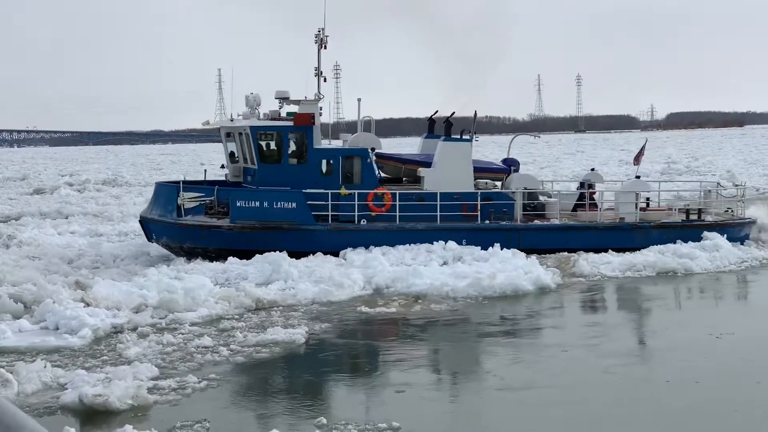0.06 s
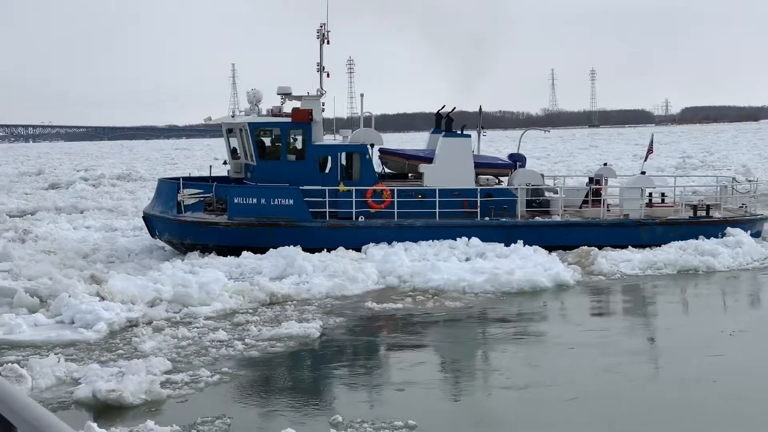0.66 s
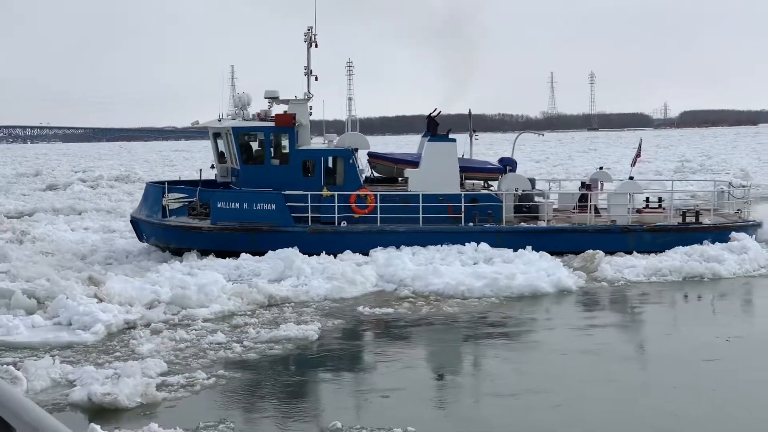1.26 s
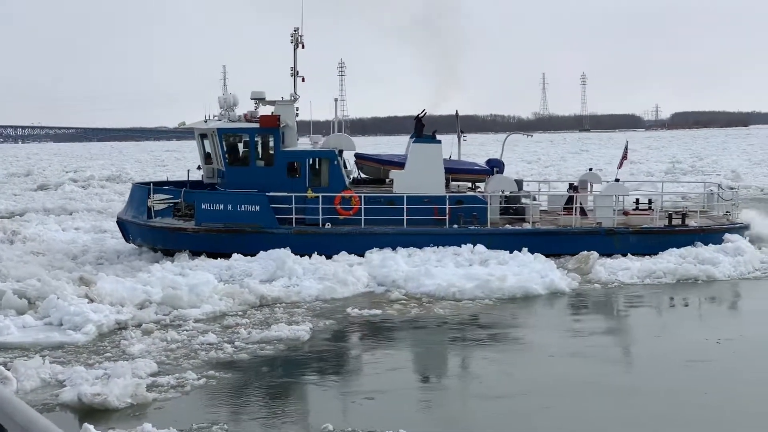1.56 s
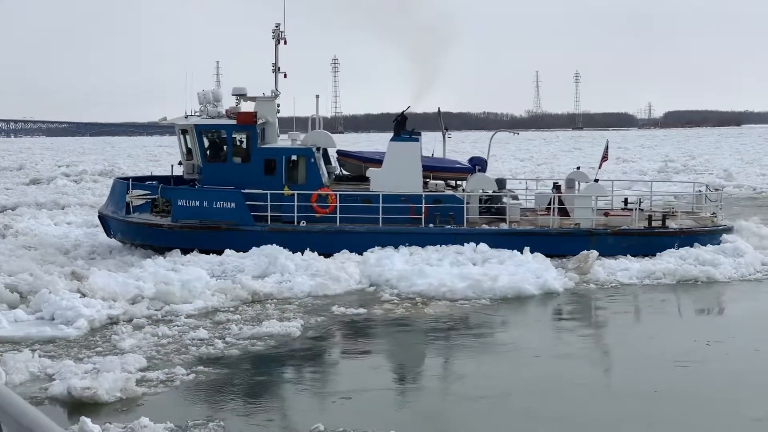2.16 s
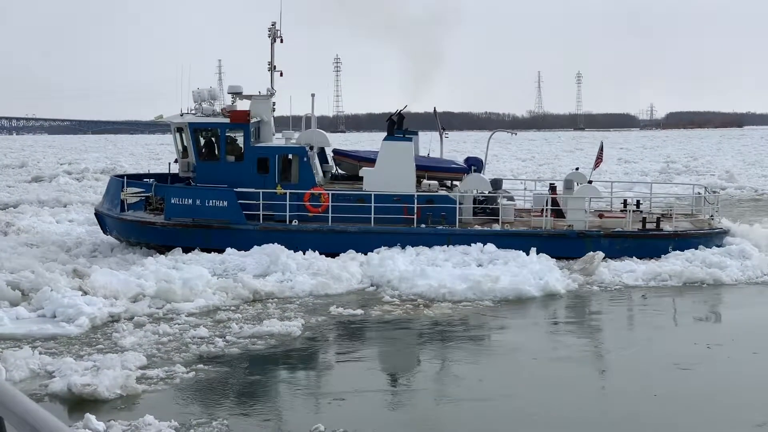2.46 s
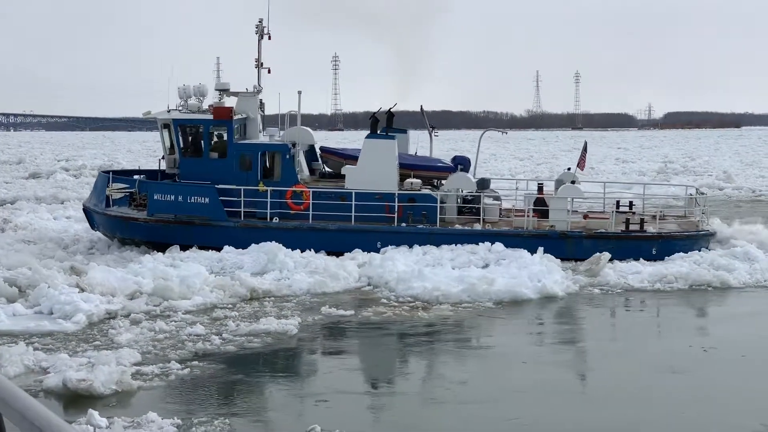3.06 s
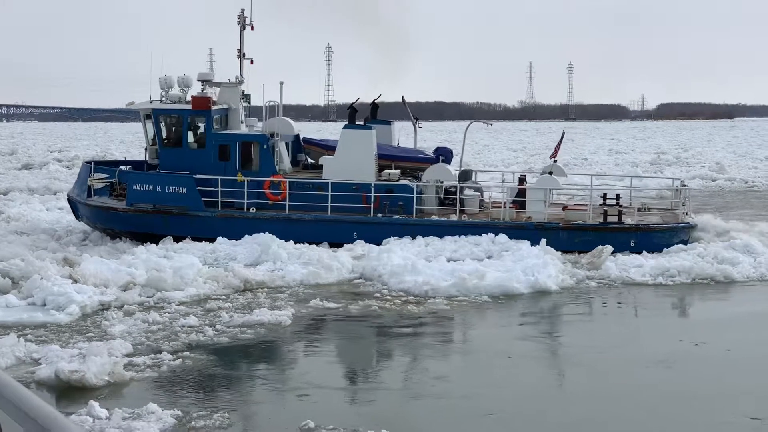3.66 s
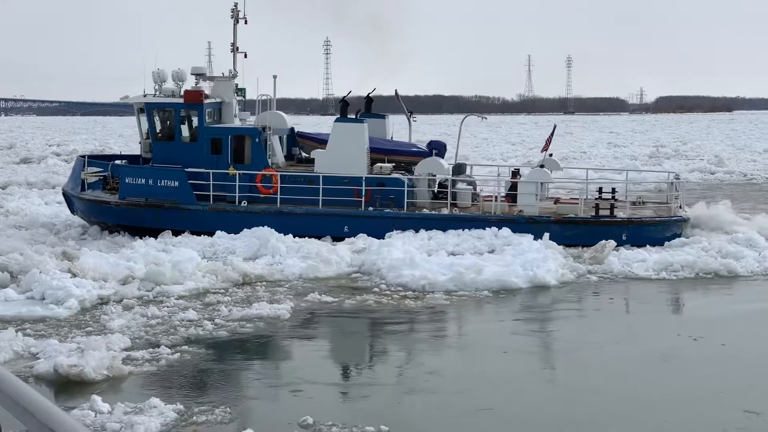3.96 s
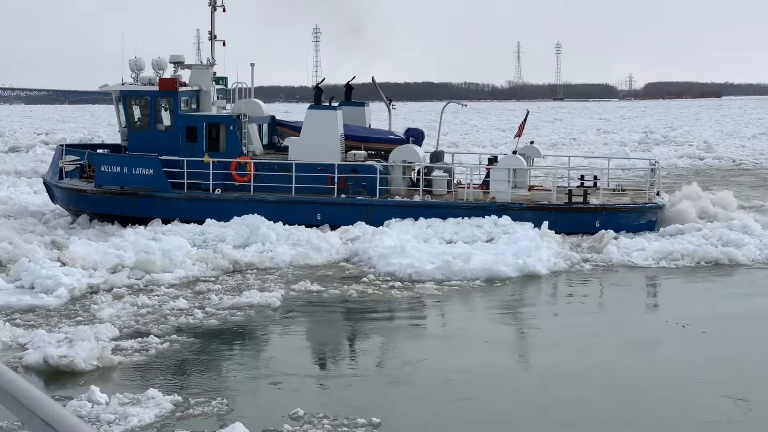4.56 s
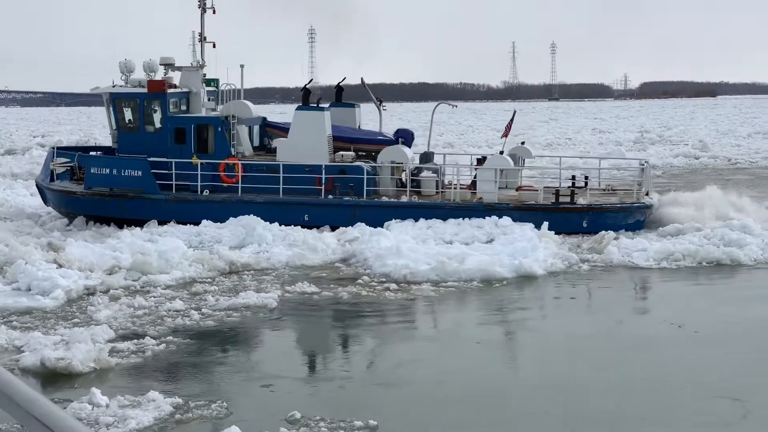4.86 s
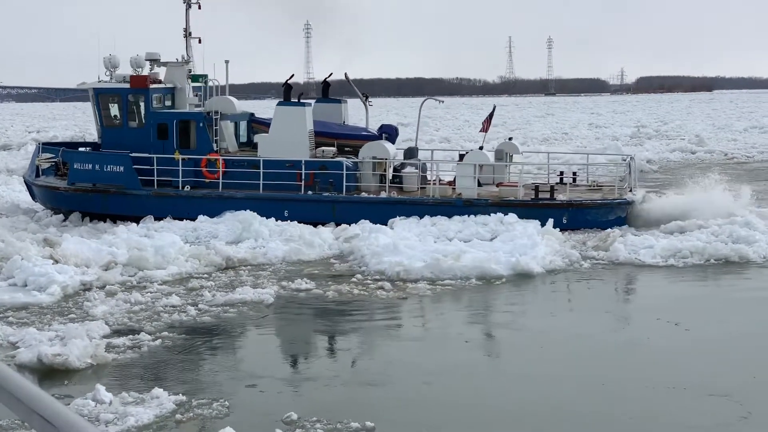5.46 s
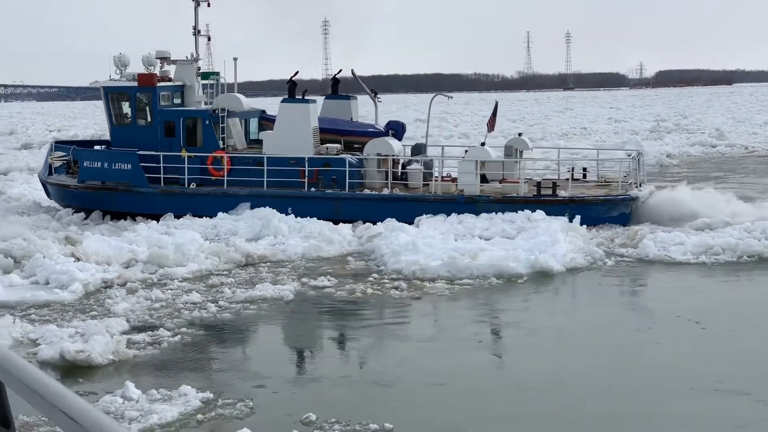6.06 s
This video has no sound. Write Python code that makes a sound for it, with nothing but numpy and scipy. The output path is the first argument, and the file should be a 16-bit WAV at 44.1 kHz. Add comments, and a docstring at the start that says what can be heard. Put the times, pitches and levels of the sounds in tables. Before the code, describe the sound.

A tug pushes through broken river ice, heard from a nearby deck for about six seconds. A deep, throbbing engine and propeller rumble with puffing exhaust runs throughout. Above it a high squeal holds nearly one pitch while fluttering in strength, with machinery clatter, gear whine and a faint thin whistle. Slush churns and fizzes softly. Floes thump the hull at about 0.6 and 0.8 seconds, and more lightly at 1.7. From around 2.5 seconds ice rasps more clearly along the hull. It cracks and crumbles near 2.9, knocks and snaps between 3.8 and 4.1, and again at 4.4 and 4.8. The engine drone builds from 4.6 to 5.6 seconds. The propeller wash boils up from about 4.9, throwing gritty spatters of slush from 5.4 to the end. Close by, a loose metal part faintly squeaks and jingles on and off.

```python
"""A tug's engines and propeller rumble through broken river ice, heard from a deck nearby.
The exhaust puffs, turbulence flutters a squeal from the drive, clatter rings the machinery casing,
gears whine and turbochargers whistle. The wash churns, fizzes and finally gushes up astern.
Ice rasps, knocks and cracks along the hull. Close by, a loose metal part squeaks and jingles."""
import sys
import numpy as np
from scipy import signal
from scipy.fft import rfft, irfft
from scipy.io import wavfile
from scipy.ndimage import uniform_filter1d

SR = 44100
rng = np.random.default_rng(int(sys.argv[2]) if len(sys.argv) > 2 else 0)


def wrap_up_sound(samples):
    """Save the sound to the file named by the first command line argument, as 16-bit audio."""
    columns = np.atleast_2d(samples).T
    # keep every value between -1 and 1, then stretch to whole-number steps
    tamed = np.clip(columns, -1, 1)
    steps = np.round(tamed * 32767).astype(np.int16)
    wavfile.write(sys.argv[1], SR, steps)


N = 277830
TIME = np.arange(N) / SR
HZ = np.fft.rfftfreq(N, 1 / SR)

# Working levels. Each row: time in seconds, then machinery, churn and fizz in relative dB.
WORK_LEVELS = [(0, -34.5, -49.5, -55.5), (.75, -35.5, -50, -55.5), (1.5, -33.5, -47.5, -55),
               (2.6, -34.5, -51, -57), (3.85, -33.5, -49, -54.5), (4.45, -34, -50, -55.5),
               (5.5, -32.5, -50.5, -54), (6, -33, -47, -50), (6.3, -30.5, -51, -53)]
# Spectrum of machinery din and ice crunch. Each row: frequency in Hz, relative density in dB.
DIN_SPECTRUM = [(300, -12.5), (460, -2.5), (570, 2.5), (720, 0.5), (950, 3.5), (1100, -1.5), (1400, 0.5),
                (1700, -4), (2200, -5.5), (2450, -11.5), (2750, -28.5), (4000, -17.5)]
# Stereo balance. Each row: frequency in Hz, left minus right in dB.
BALANCE_DB = [(60, 0.6), (400, -0.5), (700, 0.5), (1290, 4), (2380, 3.5), (2650, 4), (3300, -4),
              (4000, -.7), (6000, -4), (6900, -.7), (8100, 0), (15000, -0.5)]
# Stereo phase. Each row: frequency in Hz, lead of the left channel in radians.
LEAD_RAD = [(500, 0), (900, 0.2), (1300, -0.36), (1750, -0.3), (2300, 1.4), (2650, -0.1), (3200, 2),
            (3700, 0.9), (4100, 0.54), (4750, 1.3), (5400, -5.5), (6100, -3.5), (6500, -3.5), (6900, -7),
            (7500, -4)]


def gain_of(db):
    """Decibels to amplitude."""
    return 10 ** (np.asarray(db) / 20)


def pan(side_db):
    """Stereo gains: left up and right down by side_db."""
    return gain_of([[side_db], [-side_db]])


def unit_rms(x):
    """Scales to rms 1."""
    return x / np.sqrt(np.mean(abs(x) ** 2) + 1e-20)


def steadied(x, window_s):
    """Holds the running rms of the channel mean at 1."""
    power = uniform_filter1d(x.mean(0) ** 2, max(int(window_s * SR), 2))
    return x / np.sqrt(abs(power) + 1e-20)


def over_hz(rows):
    """Interpolates a table on a log frequency axis."""
    hz, value = np.transpose(rows)
    return np.interp(np.log(HZ + 1), np.log(hz + 1), value)


def colour(rows):
    """Gain per frequency bin, rolled off beyond the table's ends."""
    rolloff = np.minimum(HZ / rows[0][0], 1) ** 2 / np.maximum(HZ / rows[-1][0], 1) ** 4
    return gain_of(over_hz(rows)) * rolloff


def curves(rows):
    """Interpolates each column of a time table per sample."""
    times_s, *columns = np.transpose(rows)
    return [np.interp(TIME, times_s, column) for column in columns]


def swell(centre_s, length_s):
    """Cosine arch from 0 to 1 and back."""
    return np.cos(np.pi * np.clip((TIME - centre_s) / length_s, -.5, .5))


def add(mix, start_s, sound):
    """Mixes a sound in, in place."""
    part = mix[max(round(start_s * SR), 0):][:len(sound)]
    part += sound[:len(part)]


def phase_of(hz):
    """Running phase of a pitch curve."""
    return 2 * np.pi * np.cumsum(hz) / SR


def drift(rate_hz):
    """Slow random curve of rms 1."""
    return unit_rms(irfft(rfft(rng.standard_normal(N)) / (1 + (HZ / rate_hz) ** 4), N))


def noise(shape, lead_rad=0, grains_per_s=0, share=0, size_db=3.0):
    """Coloured stereo noise; grains carry the given share of its power."""
    # Each row: frequency in Hz, left-right coherence.
    coherence = [(25, 0.96), (70, 0.77), (150, 0.83), (350, 0.98), (750, 0.9), (1100, 0.92), (1400, 0.61),
                 (1900, 0.86), (2350, 0.35), (2700, 0.86), (3700, 0.52), (4400, 0.6), (4950, .2), (5700, 1),
                 (6400, 0.45), (7000, 0.65), (8200, 0.83), (9400, 0.84), (9900, 1), (11000, 1), (12000, .9),
                 (13300, .97), (15200, 1)]
    source = rng.standard_normal((2, N))
    if grains_per_s:
        signs = rng.choice([-1, 1], (2, N))
        sizes = gain_of(size_db * np.minimum(rng.exponential(1, (2, N)), 3))
        grains = signs * sizes * (rng.random((2, N)) < grains_per_s / SR)
        source = np.sqrt(1 - share) * source + np.sqrt(share) * unit_rms(grains)
    left, independent = rfft(source)
    common = np.clip(over_hz(coherence), 0, .999)
    right = (common * left + np.sqrt(1 - common ** 2) * independent) * np.exp(-1j * lead_rad)
    tilt = gain_of(over_hz(BALANCE_DB) / 2)
    return irfft(np.array([left * tilt, right / tilt]) * shape, N)


def skirt(width_hz):
    """Complex noise of rms 1 that smears a tone over nearby pitches."""
    lowpass = 1 / (1 + (HZ / width_hz) ** 2)
    return unit_rms(noise(lowpass) + 1j * noise(lowpass))


def partial(hz, waver_hz, flutter_hz=8, flutter_db=3.0):
    """Panned tone wavering in pitch and level."""
    tone = np.sin(phase_of(hz + waver_hz * drift(flutter_hz))) * gain_of(flutter_db * drift(flutter_hz))
    return unit_rms(tone) * pan(np.interp(hz, HZ, over_hz(BALANCE_DB)) / 2)


def tone_swells(rows):
    """Sines that swell briefly and fade."""
    phases = rng.uniform(0, 2 * np.pi, len(rows))
    return sum(gain_of(db) * swell(s, length_s) * np.sin(2 * np.pi * hz * TIME + phase)
               for (s, length_s, hz, db), phase in zip(rows, phases))


def engines(labour_start_s=4.6, labour_end_s=5.58, ramp_s=0.09, labour_db=13.5, build_db_per_s=6):
    """Propeller rumble and puffing exhaust; under load the firing tone builds out of them."""
    # Each row: pitch in Hz, level in dB. The firing tone is first.
    low_tones = [(69.6, -33.5), (105.8, -39), (153.5, -40)]
    # Each row: centre and length in seconds, rumble and roar change in dB.
    heaves = [(.09, 0.17, 5.5, 0.5), (0.237, 0.099, -1, 2), (.55, .2, 5, -2), (.7, 0.083, -2, -2),
              (1.043, 0.52, 3, -1.5), (1.565, 0.13, 1, -1), (1.774, 0.14, -3, 2.5), (1.889, .14, 0, -2),
              (2.332, 0.11, 5, 2), (2.796, 0.4, 2, 1.5), (3.313, 0.19, -8, 1), (3.424, 0.07, 1, 5.5),
              (3.662, 0.23, 0, -2), (3.83, 0.044, 3, 3.5), (3.94, 0.16, 4, 2), (4.187, 0.15, 6, -1),
              (4.605, 0.14, 5.5, -4), (5.607, 0.21, -5, 3), (5.93, 0.063, 6, 2), (6.249, 0.31, 1, 2.5)]
    # Each row: frequency in Hz, relative density in dB.
    propeller_spectrum = [(15, -10), (25, -21), (33, 4), (45, 3.5), (65, 4.5), (80, -3), (100, -12),
                          (125, -42)]
    exhaust_spectrum = [(60, -44), (85, -3), (105, 0), (140, -4), (200, -6), (240, -10.5), (290, -17),
                        (400, -49)]
    # Two engines fall into step. Each row: centre and length in seconds, pitch in Hz, peak in dB.
    throbs = [(.04, 0.11, 88.4, -17.5), (.872, 0.15, 77, -17), (1.279, 0.17, 99.6, -19.5),
              (1.39, 0.07, 71.1, -22.5), (1.51, 0.095, 76.5, -18), (1.567, 0.079, 38, -19.5),
              (1.667, 0.1, 70, -18), (1.79, 0.19, 43, -19.5), (2.05, 0.088, 89, -16),
              (2.24, 0.089, 69.7, -15.5), (2.33, 0.079, 61, -17), (2.38, 0.11, 84, -20),
              (2.76, 0.098, 82.2, -19.5), (2.9, 0.1, 84, -19.5), (3.3, 0.24, 100, -19.5),
              (3.431, 0.095, 71.5, -16), (3.744, 0.065, 72.9, -17.5), (3.833, 0.05, 87.5, -19),
              (6.216, 0.14, 75.8, -23)]
    load = np.clip(np.minimum(TIME - labour_start_s, labour_end_s - TIME) / ramp_s, 0, 1)
    firing_db = load * (labour_db - build_db_per_s * (labour_end_s - TIME))
    drone = 0
    for (hz, db), lift_db in zip(low_tones, [firing_db, 0, 0]):
        wander_db = 0.5 * (1 - load) * drift(1.4) + 3.5 * drift(6.2)
        tone = np.sqrt(2) * np.sin(phase_of(hz + 1.14 * drift(3.46)))
        drone += gain_of(db + lift_db + wander_db) * tone
    rumble_db, roar_db = sum(np.outer(dbs, swell(s, length_s)) for s, length_s, *dbs in heaves)
    rumble = steadied(noise(colour(propeller_spectrum)), 0.2)
    rumble *= gain_of(-26.5 + rumble_db + load + 0.3 * drift(15))  # 1 dB up under load
    roar = steadied(noise(colour(exhaust_spectrum), grains_per_s=250, share=0.24), 0.24)
    roar *= gain_of(-26.5 + roar_db + 1.33 * drift(6.6))  # puffs
    return rumble + roar + drone + tone_swells(throbs)


def drive_squeal(skirt_hz=24, sag_hz=6.0, waver_hz=1.71, purity=0.78):
    """Turbulence shakes a drive tone into a fluttering skirt; it rings purer as it flares."""
    # Each row: time in seconds, pitch in Hz.
    pitch = [(0, 858), (1.2, 860), (1.7, 864), (1.95, 873), (2.7, 869), (3.5, 865), (4.2, 869), (5.1, 865),
             (5.65, 858), (6.3, 871)]
    # Each row: time in seconds, level in dB, flutter in dB against the pure tone.
    levels = [(0, -29.5, 0), (1, -32.5, -1.5), (1.9, -30, -4), (2.6, -31, -0.5), (3.5, -31, -0.5),
              (4.4, -31, 1.5), (4.9, -31, 0.5), (5.6, -31.5, -0.5), (6.3, -32, 6)]
    # Flares and chokes. Each row: centre and length in seconds, change in dB.
    flares = [(0.406, .07, 5), (0.478, .11, -8.5), (.552, 0.065, 8.5), (0.626, 0.088, -5), (0.792, .05, -8),
              (0.846, .08, 8.5), (0.961, 0.077, -11), (1.105, 0.048, -7), (1.161, 0.088, 8.5),
              (1.33, 0.15, 0.5), (1.614, 0.13, -5), (1.718, 0.091, 7), (1.818, 0.1, 3), (1.94, .1, 3.5),
              (2.134, 0.041, -7), (2.28, 0.065, 2.5), (2.535, 0.055, 5), (2.702, 0.051, -8),
              (2.765, .06, 5), (2.83, 0.062, 4.5), (2.98, 0.27, 2), (3.08, 0.049, -11), (3.337, 0.037, 8),
              (3.454, 0.11, 5.5), (3.515, 0.036, -3), (3.58, 0.071, 7), (3.631, .04, -9),
              (3.725, 0.058, -9.5), (3.859, 0.049, 6.5), (3.93, 0.065, 9.5), (4.17, 0.084, 5),
              (4.296, 0.042, -1), (4.427, 0.046, 8), (4.515, .05, -8), (4.68, .07, 4.5), (4.845, 0.047, 7),
              (5.292, .05, -8), (5.378, 0.033, 7), (5.619, 0.037, 8.5), (6.052, .05, -8),
              (6.097, 0.052, 12.5), (6.157, 0.054, -10)]
    level_db, flutter_db = curves(levels)
    flare_db = sum(db * swell(s, length_s) for s, length_s, db in flares)
    phase = phase_of(curves(pitch)[0] + waver_hz * drift(7.8))
    shake = skirt(skirt_hz) * np.exp(-1j * phase_of(np.full(N, sag_hz)))
    tone = ((1 + gain_of(flutter_db - purity * flare_db) * shake) * np.exp(1j * phase)).real
    return gain_of(level_db + flare_db) * steadied(tone, 0.062) * pan(1)


def machinery():
    """Dense clatter rings the casing; shafts add wavering tones."""
    # Each row: frequency in Hz, width in Hz, relative level in dB.
    casing_modes = [(1202, 63, 1.5), (1296, 54, 4.5), (1620, 75, -9.5), (1776, 71, -2), (1876, 82, -2),
                    (1970, 11, -9), (2140, 110, -9), (2158, 35, -4.5), (2360, 83, -27), (3420, 100, -21.5)]
    # Each row: pitch in Hz, level in dB, waver in Hz.
    shaft_tones = [(179.7, -43.5, 1.57), (422, -53.5, 2.04), (1217, -53, 4.1), (1298, -47, 4.03),
                   (1786, -52.5, 4.9), (1813, -55, 5), (1882, -55, 4), (2056, -54.5, 1.9), (2165, -51.5, 4),
                   (2191, -52, 3.6)]
    level_db = curves(WORK_LEVELS)[0]
    lead_rad = over_hz(LEAD_RAD)
    casing_power = sum(gain_of(db) ** 2 / (1 + (1.7 * (HZ - hz) / width_hz) ** 2) ** 2
                       for hz, width_hz, db in casing_modes)
    casing = steadied(noise(np.sqrt(casing_power), lead_rad, grains_per_s=700, share=0.34), 0.28)
    din = steadied(noise(colour(DIN_SPECTRUM), lead_rad, grains_per_s=1100, share=0.37), 0.32)
    tones = sum(gain_of(db) * partial(hz, waver_hz) for hz, db, waver_hz in shaft_tones)
    return gain_of(level_db - 4.5) * casing + gain_of(level_db - 2.5) * din + tones


def gear_whine(base_db=-51.5, fade_db=1.5, fade_hz=5.3):
    """Gears whine in wavering partials, holding louder for spells."""
    # Each row: pitch in Hz, relative level in dB, waver in Hz.
    partials = [(1474, -15.5, 1.5), (1473, 1.5, 1.54), (1503, -4.5, 1.25), (2080, -4.5, 3.15)]
    # Each row: centre and length in seconds, change in dB.
    spells = [(.12, 0.34, 9), (0.934, 0.38, 2.5), (1.38, .25, 2), (2.303, 0.56, 5.5), (2.85, .25, -1),
              (3.747, .5, 11.5), (4.375, 0.17, 3.5), (5.35, 1.3, 5), (5.85, .2, 7)]
    held_db = sum(db * np.sqrt(abs(swell(s, length_s))) for s, length_s, db in spells)
    level = gain_of(base_db + held_db + fade_db * drift(fade_hz))
    return level * sum(gain_of(db) * partial(hz, waver_hz) for hz, db, waver_hz in partials)


def rotor_whistle(rows, width_hz, waver_hz, purity, flicker_db=2.5):
    """A blade tone and the air noise around it follow the rotor's wavering speed."""
    hz, db = curves(rows)
    envelope = purity + skirt(width_hz)
    lag_rad = np.interp(np.median(hz), HZ, over_hz(LEAD_RAD)) * np.array([[0], [1]])
    phase = phase_of(hz + waver_hz * drift(8.1)) - lag_rad
    return gain_of(db + flicker_db * drift(14)) * steadied((envelope * np.exp(1j * phase)).real, 0.48)


def turbochargers():
    """Thin rotor whistle plus the breathier whine of the air intakes."""
    # Each row: time in seconds, pitch in Hz, level in dB.
    whistle = [(0, 3345, -58), (.25, 3340, -60), (.5, 3335, -63), (1.15, 3350, -65), (1.3, 3365, -59),
               (1.8, 3390, -57), (2.68, 3400, -59), (2.76, 3400, -72), (3.3, 3215, -69), (4.6, 3210, -61),
               (6.3, 3225, -61)]
    intake = [(0, 3700, -69), (1.2, 3680, -68), (1.8, 3660, -58), (2.8, 3710, -64), (3.1, 3720, -56.5),
              (3.8, 3710, -58), (4.3, 3675, -60.5), (6.3, 3685, -58.5)]
    return (rotor_whistle(whistle, width_hz=56, waver_hz=8.13, purity=0.96)
            + rotor_whistle(intake, width_hz=81, waver_hz=14, purity=0.25))


def wash(fizz_left_delay_s=0.000143):
    """Slush churns and fizzes along the hull; the propeller wash boils up astern."""
    # Each row: frequency in Hz, relative density in dB.
    churn_spectrum = [(1200, 2.5), (2200, 7.5), (2700, 1.5), (3200, 2), (3700, -1.5), (4000, -9.5),
                      (4700, -5.5), (5100, -2.5), (5700, -5.5), (6500, -2.5), (9000, -48)]
    fizz_spectrum = [(3500, -20), (4600, -3), (5400, -3), (6500, -0.5), (8300, 5), (9200, 4.5),
                     (10200, -5.5), (11200, -6), (12200, 4), (13400, -1.5), (14300, 2), (15500, -15)]
    boil_spectrum = [(900, -12), (1230, 3.5), (1450, -3.5), (1700, -7), (1880, 3), (2150, 0), (2350, -17),
                     (2800, -30), (3800, -32), (4600, -13), (4900, -33), (5500, -16.5), (7000, -48)]
    # Each row: time in seconds, level in dB.
    boil_levels = [(0, -63), (3.6, -61), (4.6, -51), (4.9, -39), (5.42, -39.5), (5.66, -37), (6, -35.5),
                   (6.3, -40)]
    _, churn_db, fizz_db = curves(WORK_LEVELS)
    lead_rad = over_hz(LEAD_RAD)
    fizz_lead_rad = -2 * np.pi * HZ * fizz_left_delay_s
    lumps_db = 1.37 * drift(14)  # slush tumbles in lumps
    churn = noise(colour(churn_spectrum), lead_rad, grains_per_s=1300, share=0.33, size_db=6.5)
    fizz = noise(colour(fizz_spectrum), fizz_lead_rad, grains_per_s=2000, share=0.2)
    boil = noise(colour(boil_spectrum), lead_rad, grains_per_s=1200, share=0.07)
    return (gain_of(churn_db + 2 + lumps_db) * steadied(churn, 0.15)
            + gain_of(fizz_db + 1.27 + 0.5 * lumps_db) * steadied(fizz, 0.5)
            + gain_of(curves(boil_levels)[0] + lumps_db) * steadied(boil, 0.26))


def ice_grinding(boom_db=-38, swell_db=1.9, swell_hz=4.7, rub_db=1.5):
    """Floes shove the hull, which booms; ice grains rasp unevenly along its plating."""
    # Each row: frequency in Hz, relative density in dB.
    hull_spectrum = [(190, -14.5), (255, -1), (300, -0.5), (345, -1.5), (410, -7), (470, -19), (650, -32)]
    rasp_spectrum = [(1900, -3.5), (2250, -1.5), (2400, 6), (2550, -7.5), (2750, -12), (3200, -8.5),
                     (3700, -12), (4000, -27)]
    # Each row: time in seconds, level in dB.
    rasp_levels = [(0, -73), (1.5, -57), (1.9, -52), (2.6, -45), (3.2, -46), (3.8, -45.5), (4.4, -50.5),
                   (5, -51), (6.3, -46)]
    boom = noise(colour(hull_spectrum), grains_per_s=250, share=0.35)
    rasp = noise(colour(rasp_spectrum), over_hz(LEAD_RAD), grains_per_s=500, share=0.63)
    return (gain_of(boom_db + swell_db * drift(swell_hz)) * steadied(boom, 0.22)
            + gain_of(curves(rasp_levels)[0] + rub_db * drift(14)) * steadied(rasp, 0.72))


def metal_squeak(floor_db=-70.5, width_hz=32, purity=0.6, flutter_db=4.0, lead_rad=-0.98):
    """The loose part chafes and sings a thin, rough cluster of notes."""
    # Each row: centre and length in seconds, relative peak in dB.
    squeaks = [(.15, 0.37, -69), (1.35, .5, -67), (1.68, .26, -63), (2.65, .5, -64), (3.05, .55, -62),
               (3.63, .1, -60), (3.93, .23, -60), (4.62, 0.31, -59), (4.84, 0.24, -56.5), (5.17, .3, -64.5)]
    # Each row: pitch in Hz, relative level in dB.
    notes = [(5170, 1.5), (5160, -6), (5085, -4)]
    level = gain_of(floor_db) + sum(gain_of(db) * swell(s, length_s) for s, length_s, db in squeaks)
    cluster = 0
    for hz, db in notes:
        phase = 2 * np.pi * hz * TIME - lead_rad * np.array([[0], [1]])
        chafe = (unit_rms(purity + skirt(width_hz)) * np.exp(1j * phase)).real
        cluster += gain_of(db + flutter_db * drift(22)) * steadied(chafe, 0.15) / np.sqrt(2)
    return level * cluster * pan(-1.5)


def metal_jingle(gap_s=0.045, bounce_s=0.016, bounce_db=-4, uneven_db=3, detune_hz=14):
    """The loose part knocks in bouts; each knock and its two bounces ring a close pair of modes."""
    # Each row: frequency in Hz, relative level in dB, t60 in seconds.
    modes = [(13800, 1.5, 0.14), (13958, 0, .13)]
    # Each row: start and length in seconds, relative level in dB.
    bouts = [(.004, .06, -46.5), (.15, .02, -53), (.28, .2, -58), (1.15, .1, -53), (1.274, .19, -46),
             (1.65, .11, -45), (2.412, .05, -47), (2.6, .11, -46), (2.825, .42, -46), (3.3, .27, -57),
             (3.597, .06, -40), (3.763, .13, -43), (4.144, .18, -42.5), (4.471, .17, -43),
             (4.79, .13, -37.5), (5.007, .32, -42.5), (5.73, .22, -44), (6.02, .04, -34.5)]
    out, t = np.zeros(N), np.arange(SR // 4) / SR
    contact = np.sin(np.pi / 2 * np.minimum(t / .002, 1)) ** 2
    for (start_s, length_s, bout_db), knocks in zip(bouts, rng.uniform(-1, 1, (len(bouts), 16, 3, 3))):
        s = start_s
        for knock in knocks:
            if s > start_s + length_s:
                break
            spacing, _, seating = knock[0]
            shift_hz = detune_hz * seating  # it never seats the same way twice
            rings = [contact * gain_of(db - 60 * t / t60_s) * np.sin(2 * np.pi * (hz + shift_hz) * t)
                     for hz, db, t60_s in modes]
            for bounce, (jitter, lean, _) in enumerate(knock):
                hit_db = bout_db - 3.5 + bounce_db * (bounce > 0)
                mode_gains = gain_of(hit_db + uneven_db * lean * np.array([1, -1]))
                add(out, s + bounce * bounce_s * (1 + .3 * jitter), mode_gains @ rings)
            s += gap_s * (1 + .6 * spacing)
    return out


def machinery_rings():
    """Single machinery tones ring briefly out of the din."""
    # Each row: centre and length in seconds, pitch in Hz, peak in dB before panning.
    rings = [(.27, .14, 1890, -41.5), (1.71, .12, 2155, -38), (2.84, 0.091, 1292, -37),
             (2.99, 0.19, 1304, -36.5), (3.31, 0.089, 1298, -31), (3.8, 0.13, 2065, -36.5),
             (4.91, 0.088, 1280, -32.5), (5.64, 0.082, 1230, -32), (5.73, 0.15, 1302, -33),
             (5.88, 0.11, 1875, -36), (6.01, 0.12, 1880, -33.5)]
    return tone_swells(rings) * pan(2)


def floe_knocks(thump_t60_s=0.036, cushion_s=0.0019):
    """Floes thump the hull and ring its plating; slush cushions the ring's onset."""
    # Each row: start in seconds, peak in dB, pitch in Hz, plating gain in dB.
    knocks = [(0.586, -5, 85, -46), (.761, -4, 90, -48), (1.664, -18, 160, -28), (3.812, -7.5, 130, -22),
              (3.965, -13, 175, -36), (3.976, -27, 250, -23), (4.036, -13.5, 210, -40),
              (4.81, -13, 165, -35)]
    # Each row: frequency in Hz, relative level in dB, t60 in seconds.
    plating_modes = [(268, 2, 0.029), (334, -7.5, 0.043), (426, -5.5, 0.032), (537, -2.5, 0.032),
                     (675, -1, 0.034)]
    out, t = np.zeros(N), np.arange(SR // 4) / SR
    plating = sum(gain_of(db - 60 * t / t60_s) * np.sin(2 * np.pi * hz * t)
                  for hz, db, t60_s in plating_modes)
    plating *= np.minimum(t / cushion_s, 1)
    for s, db, hz, plating_db in knocks:
        thump = gain_of(db - 60 * t / thump_t60_s) * np.sin(2 * np.pi * hz * t)
        add(out, s, thump + gain_of(plating_db) * plating)
    return out


def ice_cracks(snap_t60_s=0.039, crumble_t60_s=0.17, attack_s=0.00088):
    """Ice snaps, then crumbles: bright splinters over the floe's duller crunch."""
    # Each row: start in seconds, then splinters and crunch in relative dB.
    cracks = [(1.848, -52, -43), (2.838, -62, -25), (2.87, -47, -23), (2.897, -49, -21), (3.963, -39, -20),
              (3.994, -33, -28), (4.026, -37.5, -28), (4.042, -43, -34), (4.396, -48, -21),
              (4.81, -48, -36)]
    # Each row: frequency in Hz, relative density in dB.
    splinter_spectrum = [(2800, -22), (3700, -22), (4200, 2), (4700, -3), (5150, 5), (5650, -3),
                         (6100, -22), (7000, -32)]
    t = np.arange(SR // 4) / SR
    fracture = gain_of(-6 - 60 * t / snap_t60_s) + gain_of(-15 - 60 * t / crumble_t60_s)
    fracture *= 1 - np.exp(-t / attack_s)
    splinter_level, crunch_level = np.zeros((2, N))
    for s, splinter_db, crunch_db in cracks:
        add(splinter_level, s, gain_of(splinter_db) * fracture)
        add(crunch_level, s, gain_of(crunch_db) * fracture)
    return (splinter_level * unit_rms(noise(colour(splinter_spectrum)))
            + crunch_level * unit_rms(noise(colour(DIN_SPECTRUM))))


def slush_gushes():
    """The propeller throws up slush, which falls back as gritty spatter."""
    # Each row: centre and length in seconds, peak in dB.
    gushes = [(5.4, .07, -45), (5.644, 0.059, -36), (5.733, 0.083, -38), (5.88, .06, -33.5),
              (6.01, .12, -41), (6.23, 0.08, -37)]
    # Each row: frequency in Hz, relative density in dB.
    spatter_spectrum = [(1100, -2.5), (1300, -2), (1600, -2), (1900, 5), (2250, -3.5), (2700, -18),
                        (3600, -16), (4700, -19), (6000, -28)]
    level = sum(gain_of(db) * swell(s, length_s) for s, length_s, db in gushes)
    spatter = noise(colour(spatter_spectrum), over_hz(LEAD_RAD), grains_per_s=420, share=0.6)
    return level * steadied(spatter, 0.14)


def scene():
    """Tug, water, ice and loose metal in stereo."""
    tug = turbochargers() + engines() + drive_squeal() + machinery() + gear_whine() + machinery_rings()
    river = wash() + slush_gushes() + ice_grinding()
    return tug + river + metal_jingle() + metal_squeak() + floe_knocks() + ice_cracks()


def record(dry):
    """Low-pass at 15650 Hz."""
    lowpass = signal.firwin(511, 15650, window=("kaiser", 9), fs=SR)
    return signal.oaconvolve(dry, lowpass[None], "same")


dry = scene()
out = record(dry)
wrap_up_sound(out)
```